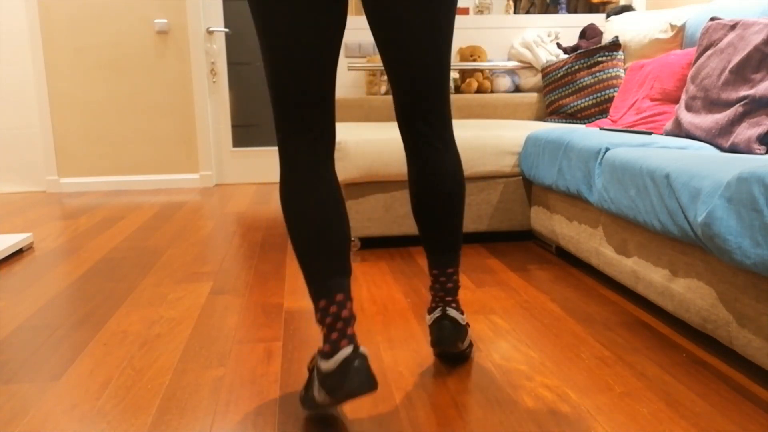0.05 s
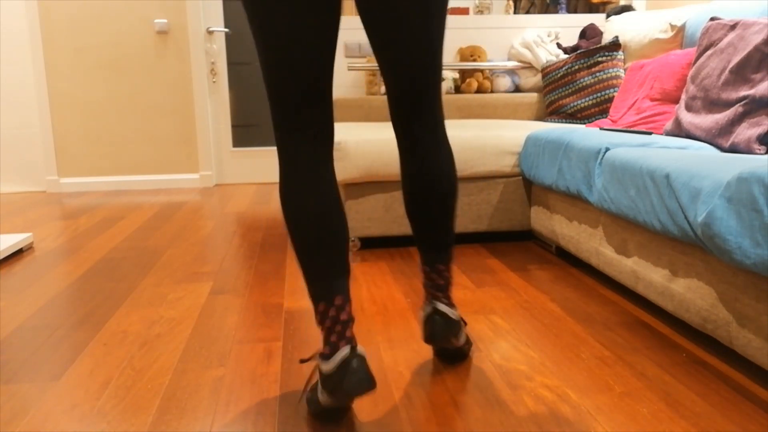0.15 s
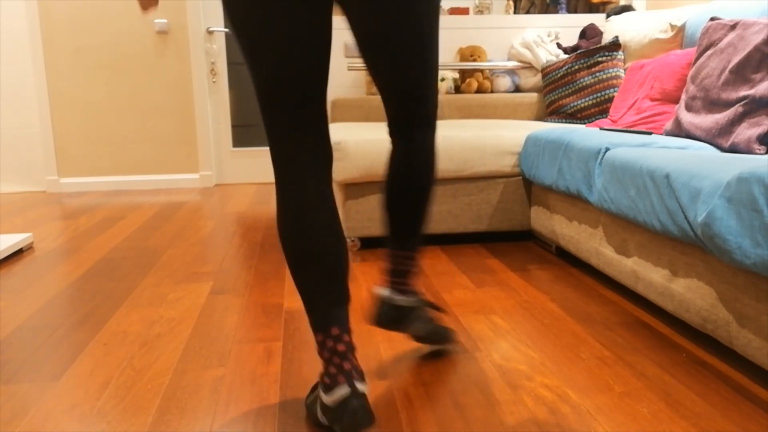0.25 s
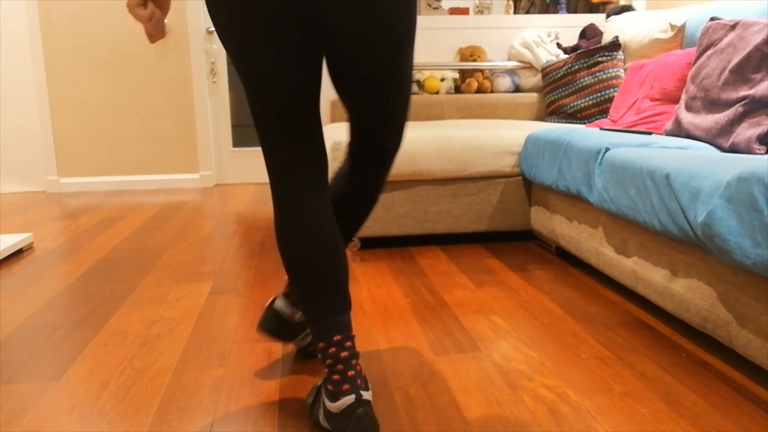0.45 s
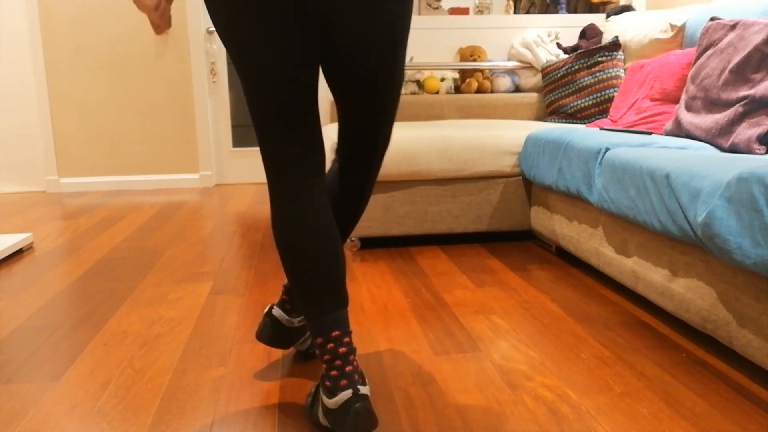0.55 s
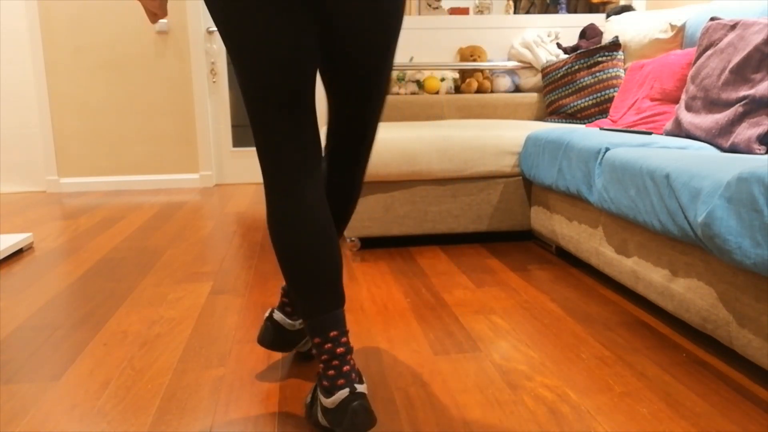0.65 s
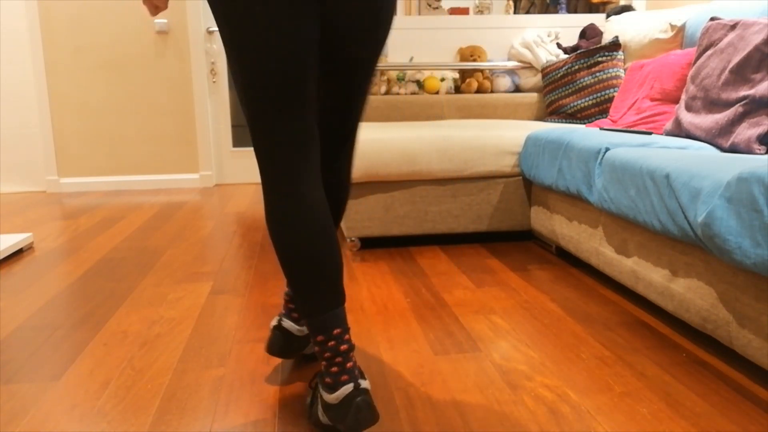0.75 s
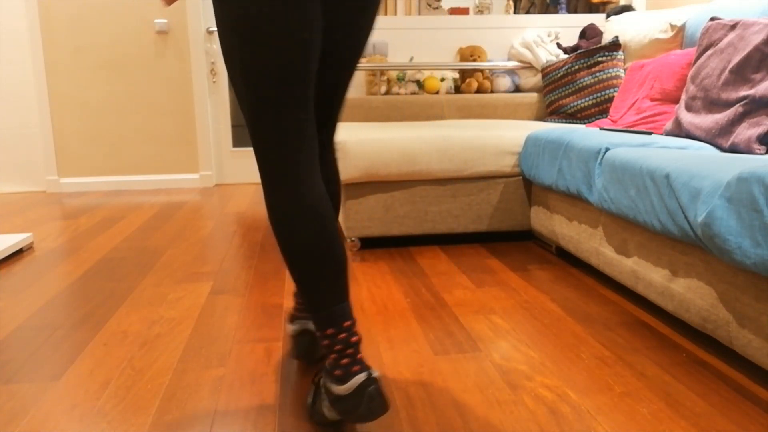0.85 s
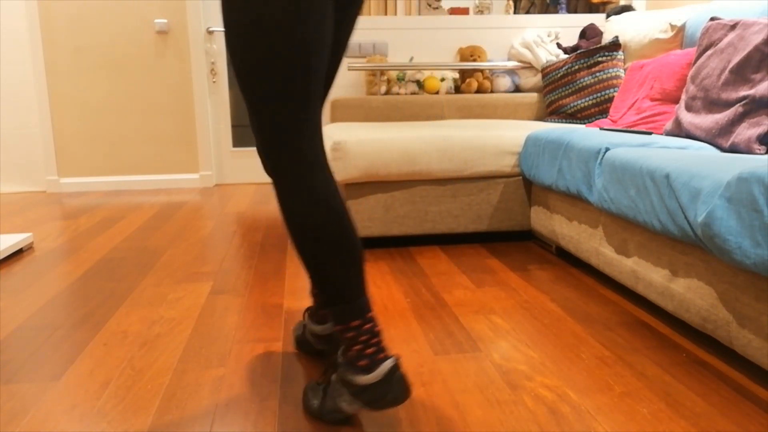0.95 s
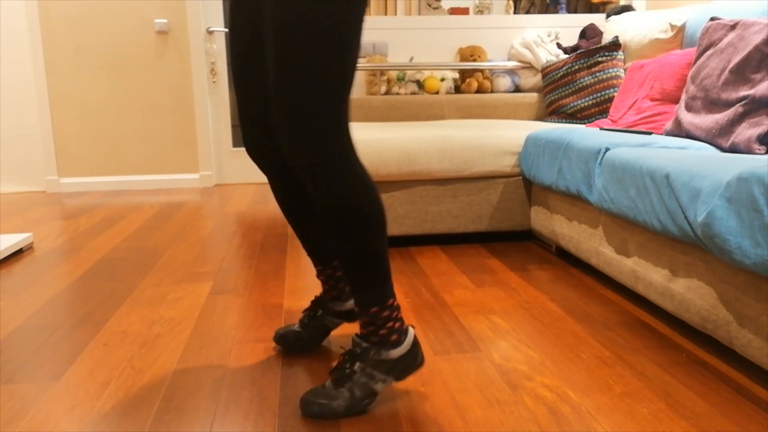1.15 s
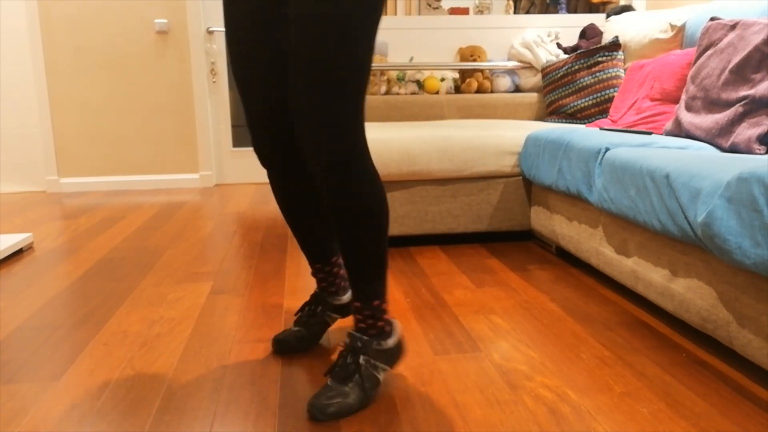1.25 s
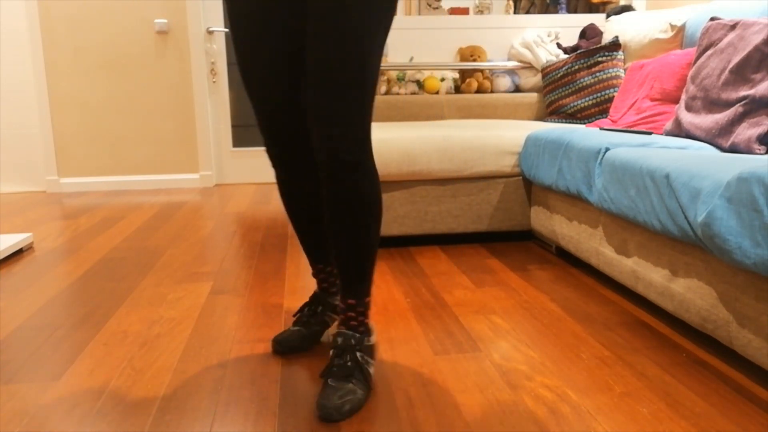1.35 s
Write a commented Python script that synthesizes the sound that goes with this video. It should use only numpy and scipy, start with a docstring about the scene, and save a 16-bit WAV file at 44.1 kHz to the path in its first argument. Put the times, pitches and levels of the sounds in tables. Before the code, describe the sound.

A shoe cracks on a wooden floor, then a softer thud and a sliding sole.

```python
"""A quiet living room with a wooden floor, a stereo microphone close to a dancer's feet.
An earlier step dies away; a hard sole cracks on the boards, then a softer step thuds. The floor booms
under the weight and the room rings briefly. At the end a sole slides round over the wood: a faint
squeak, then a swelling friction hiss. Behind it all lie the room's steady rumble and hiss."""
import sys
import numpy as np
from scipy import signal
from scipy.fft import rfft, irfft
from scipy.io import wavfile
from scipy.ndimage import uniform_filter1d

SR = 44100
rng = np.random.default_rng(int(sys.argv[2]) if len(sys.argv) > 2 else 0)


def wav_record(signal):
    """Record a signal, one row per channel, as 16-bit PCM in the file named by sys.argv[1]."""
    frames = np.transpose(np.atleast_2d(signal))
    bounded = np.clip(frames, -1, 1)
    # unit amplitude maps onto the largest positive 16-bit level
    quanta = np.round(bounded * 32767).astype(np.int16)
    wavfile.write(sys.argv[1], SR, quanta)


N = 61739

# The crack, straight from sole to microphone: freq_hz, level_db
CRACK_COLOUR = [(20, -27), (60, -9), (200, 8), (700, 5.5), (1500, 5.5), (2500, 2.5), (3800, 9), (5000, 5.5),
                (6300, -7.5), (9000, -16), (12000, -34), (16000, -50)]
# The crack as the room returns it: freq_hz, level_db
CRACK_ROOM_COLOUR = [(60, -7), (135, 15), (175, 2.5), (220, 16.5), (290, 13), (450, 14.5), (680, 6.5),
                     (1000, 10), (1600, 11), (3000, 7), (4700, 1.5), (6200, -5), (9500, -6), (12500, -18.5),
                     (16000, -43)]
# Early echoes off nearby furniture and walls: delay_s, left_db, right_db
ECHOES = [(.0033, -7, -24), (.00905, -4, -8.5)]

def hard_step(start_s=.2063, pan_db=2, bend_lag=.56, echo_cutoff_hz=4200):
    """A hard sole cracks on the wood, a little to the left, and sets boards and room ringing."""
    out = np.zeros((2, N))
    crack = -click(CRACK_COLOUR)
    for _ in range(4):  # all-passes: bending waves carry the treble ahead of the bass
        crack = signal.lfilter([-bend_lag, 1], [1, -bend_lag], crack)
    add(out, start_s, crack * amp([[pan_db], [-pan_db]]))
    dull = signal.lfilter(*signal.butter(2, echo_cutoff_hz, fs=SR), crack)
    for delay_s, left_db, right_db in ECHOES:
        add(out, start_s + delay_s, dull * amp([[left_db], [right_db]]))
    add(out, start_s, room_tail(CRACK_ROOM_COLOUR, rise_s=.003))
    add(out, start_s, board_ring(soft_hz=np.inf))
    return out


# Soft footfalls near the microphone: start_s, level_db, slap_db
SOFT_STEPS = [(-.075, -8.5, -8.5), (0.4576, -6.5, -17)]
# The thud, heard close: freq_hz, level_db
THUD_COLOUR = [(60, 8), (150, -6), (250, 12.5), (420, 13), (900, 1.5), (1600, -12.5), (3000, -7.5),
               (5000, -33), (10000, -32), (16000, -40)]
# The thud as the room returns it: freq_hz, level_db
THUD_ROOM_COLOUR = [(60, -3), (160, 0), (250, 13.5), (430, 18.5), (700, 10), (1100, 5), (1700, -4),
                    (4000, -20), (16000, -53)]
# The sole's light slap: freq_hz, level_db
SLAP_COLOUR = [(300, -15), (1200, -3), (2000, 5.5), (2900, 7.5), (4000, -1.5), (6500, -7), (10000, -3),
               (16000, -19)]

def soft_steps(direct_db=-1, echo_s=.0212, echo_db=-4, ring_db=-7):
    """Each step is a dull push on the boards, its echo off the far wall and a slap of the sole."""
    out = np.zeros((2, N))
    thud = click(THUD_COLOUR)
    for start_s, level_db, slap_db in SOFT_STEPS:
        add(out, start_s, -amp(level_db + direct_db) * thud)
        add(out, start_s + echo_s, amp(level_db + echo_db) * thud)
        add(out, start_s, amp(level_db) * room_tail(THUD_ROOM_COLOUR, rise_s=.0019))
        add(out, start_s, amp(slap_db) * room_tail(SLAP_COLOUR, rise_s=.008))
        add(out, start_s, amp(level_db + ring_db) * board_ring(soft_hz=600))
    return out


# Modes of the boards underfoot: pitch_hz, level_db, t60_s
BOARD_MODES = [(225.8, -31, .16), (244.1, -38.5, 0.43), (354.6, -33.5, 0.32), (446.7, -34, 0.33),
               (552, -46.5, 0.32), (1088, -38, 0.26), (1536, -36, 0.27), (2420, -37, 0.2),
               (3036, -32, 0.13), (3512, -44.5, 0.43)]

def board_ring(soft_hz, rise_s=.0019):
    """Struck boards ring; a soft contact barely stirs the modes above soft_hz."""
    t, out = np.arange(SR) / SR, np.zeros((2, SR))
    for hz, level_db, t60_s in BOARD_MODES:
        mic_phases = np.arccos(read(MIC_LIKENESS, hz)) * np.array([[.5], [-.5]])
        tone = np.sin(2 * np.pi * (hz * t + rng.random()) + mic_phases)
        fade = np.exp(-np.log(1000) * t / t60_s)
        out += amp(level_db) * tone * fade / (1 + (hz / soft_hz) ** 2)
    return out * (1 - np.exp(-t / rise_s))


# The dancer's weight settling: start_s, level_db, t60_s (at reference_hz)
WEIGHTS = [(-.009, -38, .42), (.2365, -38.5, 0.65), (0.499, -38, .45), (.825, -62, 1.0)]
# Slow modes of the whole floor: pitch_hz, level_db
FLOOR_MODES = [(27, -6.5), (51.3, -2.5), (67, -3.5), (90, -5), (112, -9.5), (137, -12)]

def floor_boom(rise_s=.006, reference_hz=51.3, damping_power=.25):
    """The floor sways in its lowest modes as the weight arrives; the higher ones die sooner."""
    t, out = np.arange(SR) / SR, np.zeros((2, N))
    rise = 1 - np.exp(-t / rise_s)
    for start_s, level_db, t60_s in WEIGHTS:
        for hz, mode_db in FLOOR_MODES:
            fade = np.exp(-np.log(1000) * t / t60_s * (hz / reference_hz) ** damping_power)
            add(out, start_s, amp(level_db + mode_db) * np.sin(2 * np.pi * hz * t) * rise * fade)
    return out


# How hard the sliding sole bears on the wood: time_s, pressure_db
SLIDE_PRESSURE = [(.55, -26), (.72, -8), (.86, -10.5), (.95, -5), (1.08, -0.1), (1.2, 1.5), (1.29, 2),
                  (1.4, 0)]
# The slide's rising resonance: time_s, pitch_hz
SLIDE_RESONANCE = [(.7, 2400), (.9, 2750), (1.03, 2900), (1.14, 3200), (1.25, 4700), (1.4, 5000)]
# The hiss close up, at a pressure of 0 dB: freq_hz, level_db
SLIDE_COLOUR = [(300, -68.5), (700, -66.5), (1200, -56.5), (1900, -59.5), (3200, -54.5), (4700, -53),
                (7000, -55.5), (10000, -51), (12000, -59), (14000, -66.5), (16000, -74)]

def sole_slide(ring_db=-53.5, ring_follow=.18, treble_follow=.41, flicker_db=1.5):
    """Friction hiss brightens with pressure, while one resonance rises and widens."""
    def gain(hz, t):
        pressure_db = np.interp(t, *np.transpose(SLIDE_PRESSURE), left=-80)
        follow = 1 + treble_follow * np.log2(np.maximum(hz, 1000) / 5000)
        hiss = amp(read(SLIDE_COLOUR, hz) + pressure_db * follow)
        centre_hz = np.interp(t, *np.transpose(SLIDE_RESONANCE))
        half_width_hz = 340 * amp(pressure_db)
        ring = amp(ring_db + ring_follow * pressure_db) / (1 + ((hz - centre_hz) / half_width_hz) ** 2)
        flicker = uniform_filter1d(rng.standard_normal(hiss.shape), size=4, axis=0)  # across frequency
        flicker = uniform_filter1d(flicker, size=16, axis=1)  # across time
        return np.hypot(hiss, ring) * amp(flicker_db * flicker / flicker.std())
    return shaped_noise(gain)


# The squeak as the sole starts to turn: time_s, level_db
SQUEAK_SWELL = [(.62, -64), (.74, -49.5), (.86, -46), (1.0, -50), (1.08, -68)]

def sole_squeak(pitch_hz=2220, half_width_hz=50):
    """A thin friction tone of steady pitch, before the sole runs freely."""
    def gain(hz, t):
        level_db = np.interp(t, *np.transpose(SQUEAK_SWELL), left=-120, right=-120)
        return amp(level_db) / (1 + ((hz - pitch_hz) / half_width_hz) ** 2)
    return shaped_noise(gain, size=2048)


# Decay of the living room: freq_hz, t60_s
ROOM_DECAY = [(100, 0.96), (260, 0.36), (700, 0.35), (1800, 0.44), (4800, 0.44), (10000, 0.41),
              (16000, 0.27)]

def room_tail(colour, rise_s, early_db=-9, early_s=.014):
    """The room answers one contact: dense early scatter, then a tail that dies band by band."""
    t = np.arange(N) / SR
    tail = shaped_noise(lambda hz, s: amp(-60 * s / read(ROOM_DECAY, hz)))
    tail *= (1 - np.exp(-t / rise_s)) * (1 + amp(early_db) * np.exp(-t / early_s))
    tail /= np.sqrt((tail ** 2).sum() / 2)
    return signal.fftconvolve(tail, click(colour)[None], axes=1)[:, :N]


# Room tone all round the microphone: freq_hz, level_db
ROOM_TONE = [(20, -45), (60, -48), (120, -51), (250, -53), (500, -60), (750, -61), (1200, -57.5),
             (2200, -63), (5000, -63.5), (10000, -65.5), (13000, -69.5), (16000, -73)]

def room_tone():
    """Steady rumble and hiss of the quiet room."""
    return shaped_noise(lambda hz, t: amp(read(ROOM_TONE, hz)), size=2048)


# How alike the room sounds on the microphone's two sides: freq_hz, correlation
MIC_LIKENESS = [(60, 0.93), (200, .98), (280, .5), (600, .12), (2000, .2), (5000, 0.064), (12000, 0.018)]

def shaped_noise(gain, size=512):
    """Stereo noise, alike in the bass and unrelated in the treble, weighted by gain(hz, time_s)."""
    mid, side = rfft(rng.standard_normal((2, N)))
    likeness = read(MIC_LIKENESS, np.fft.rfftfreq(N, 1 / SR))
    mid *= np.sqrt((1 + likeness) / 2)
    side *= np.sqrt((1 - likeness) / 2)
    noise = irfft(np.array([mid + side, mid - side]), N)
    frames = dict(fs=SR, nperseg=size, noverlap=size - size // 4)
    hz, t, spectra = signal.stft(noise, **frames)
    return signal.istft(spectra * gain(hz[:, None], t), **frames)[1][:, :N]


def click(colour, size=4096):
    """The shortest causal pulse that has this colour."""
    log_gain = np.log(amp(read(colour, abs(np.fft.fftfreq(size, 1 / SR)))))
    spectrum = np.exp(np.conj(signal.hilbert(log_gain)))
    return np.fft.ifft(spectrum).real[:size // 2]


def amp(db):
    """Decibels to gain."""
    return 10 ** (np.asarray(db) / 20)


def read(table, hz):
    """Reads a table on a log-frequency axis."""
    table_hz, values = np.transpose(table)
    return np.interp(np.log(hz + 1), np.log(table_hz + 1), values)


def add(mix, start_s, sound):
    """Mixes a sound in at start_s; with a negative start it is already under way."""
    at = round(start_s * SR)
    sound = sound[..., max(-at, 0):]
    part = mix[:, max(at, 0):][:, :sound.shape[-1]]
    part += sound[..., :part.shape[1]]


def scene():
    """Close footwork over the room tone."""
    return hard_step() + soft_steps() + floor_boom() + sole_slide() + sole_squeak() + room_tone()


def record(dry):
    """The recorder passes the microphone's signal up to 16 kHz."""
    lowpass = signal.firwin(255, 16000, window=("kaiser", 8), fs=SR)
    return signal.oaconvolve(dry, lowpass[None], "same", axes=1)


dry = scene()
out = record(dry)
wav_record(out)
```